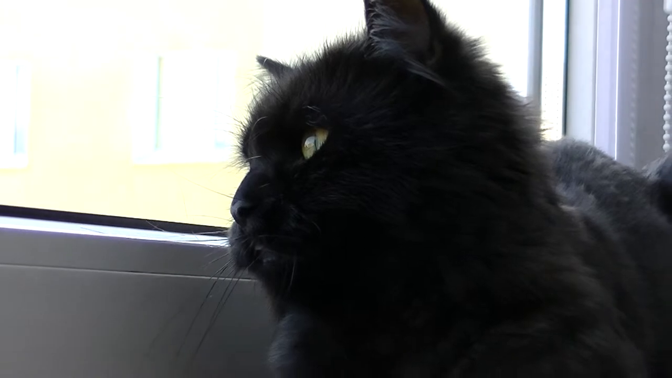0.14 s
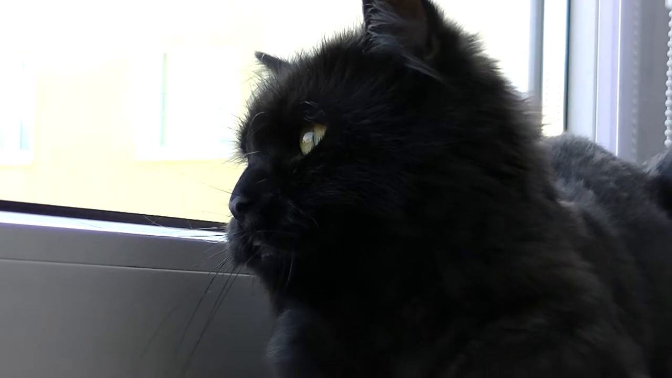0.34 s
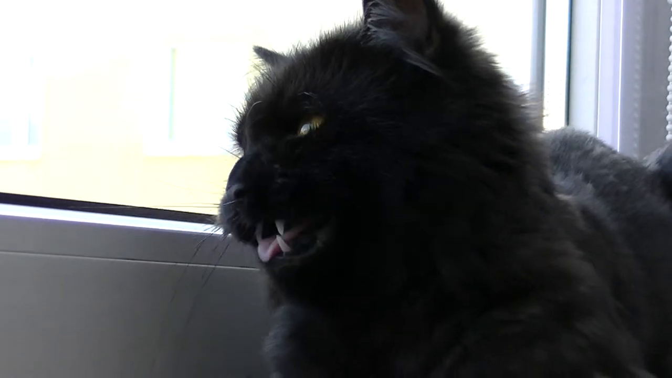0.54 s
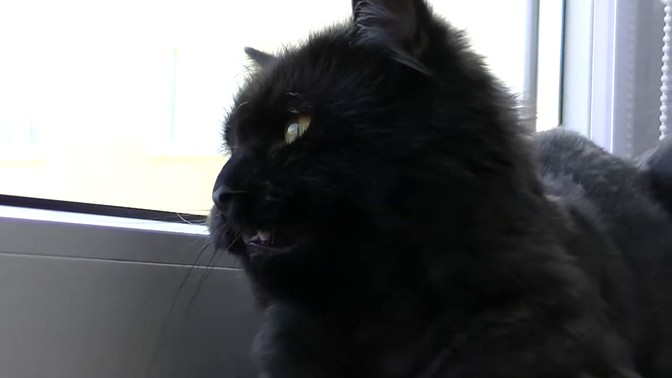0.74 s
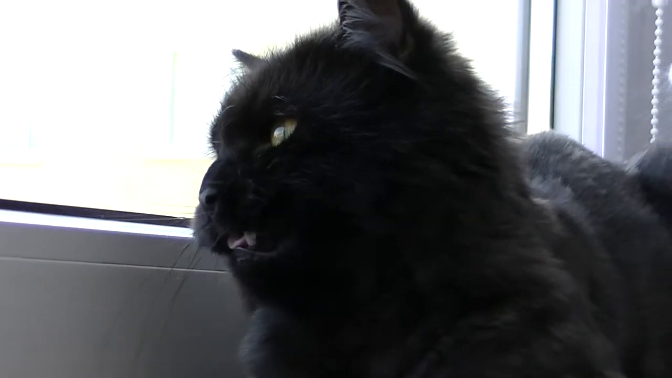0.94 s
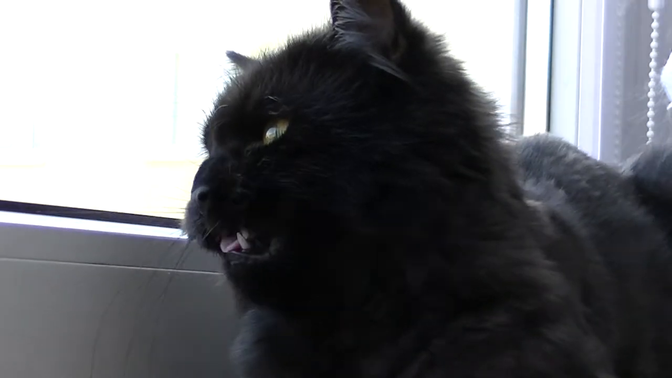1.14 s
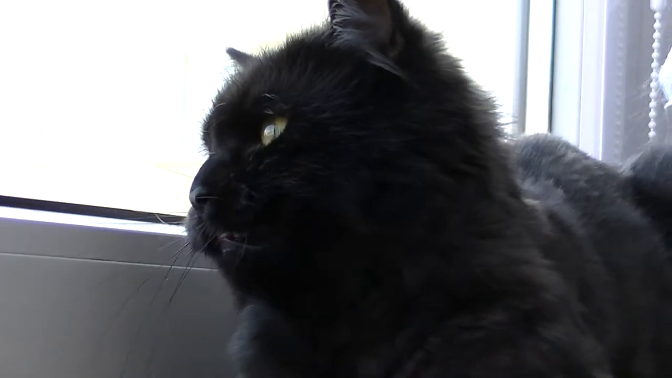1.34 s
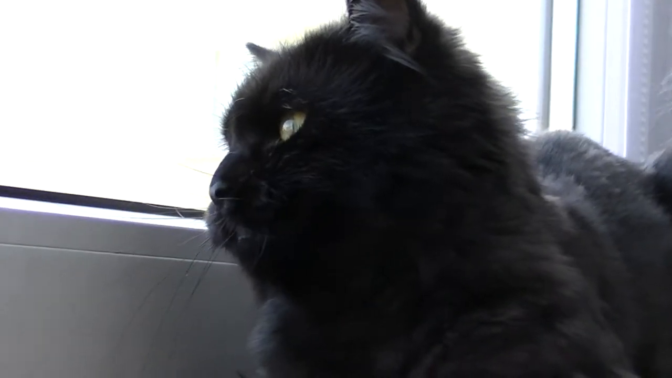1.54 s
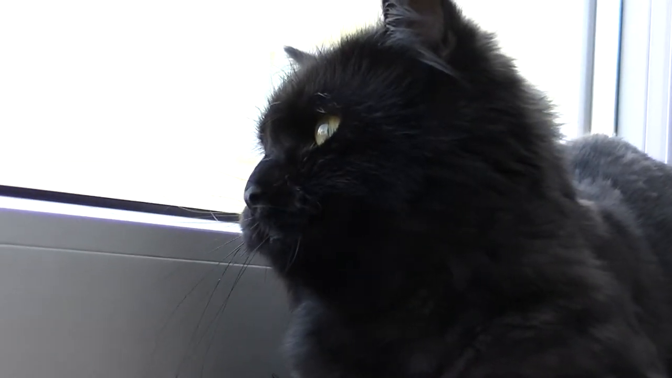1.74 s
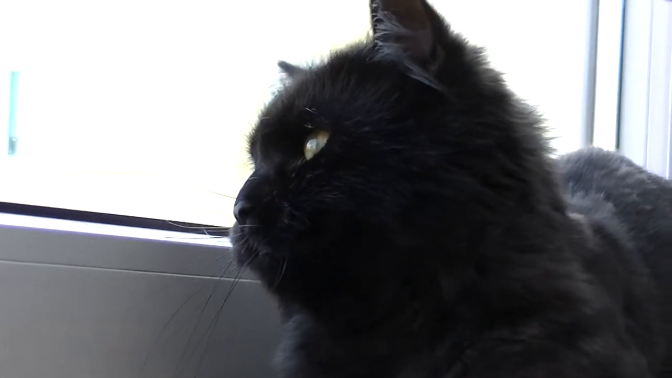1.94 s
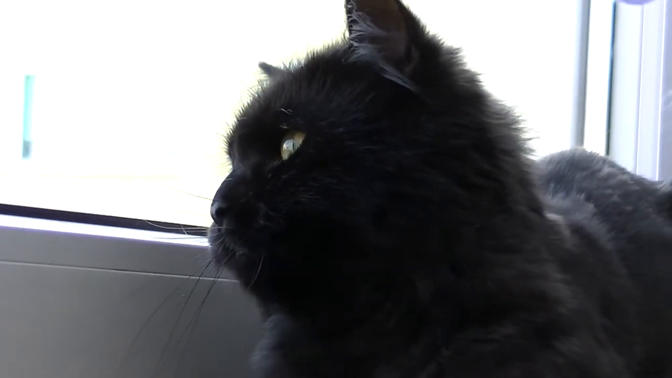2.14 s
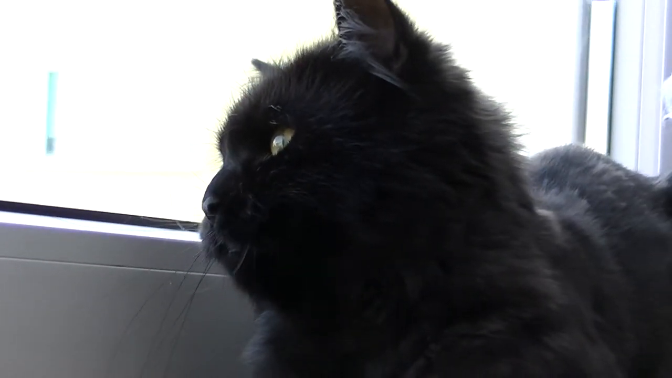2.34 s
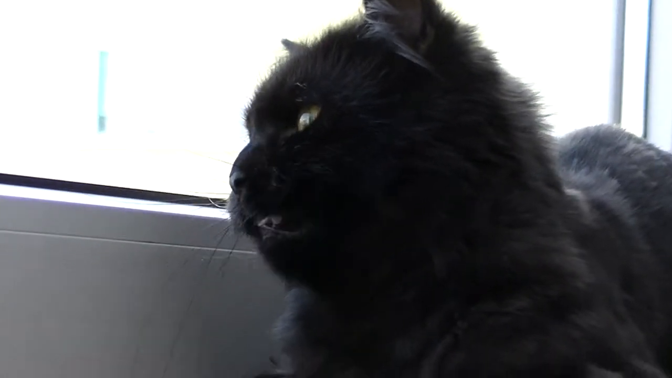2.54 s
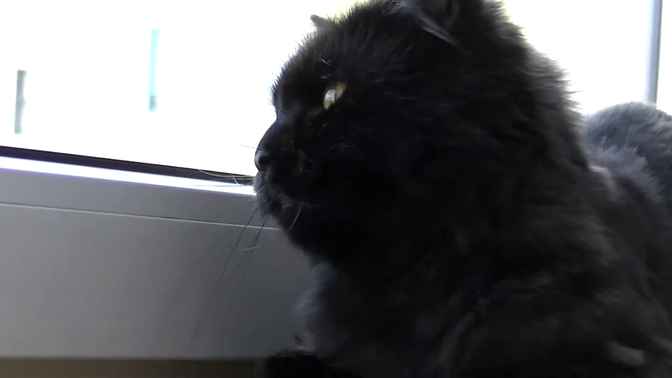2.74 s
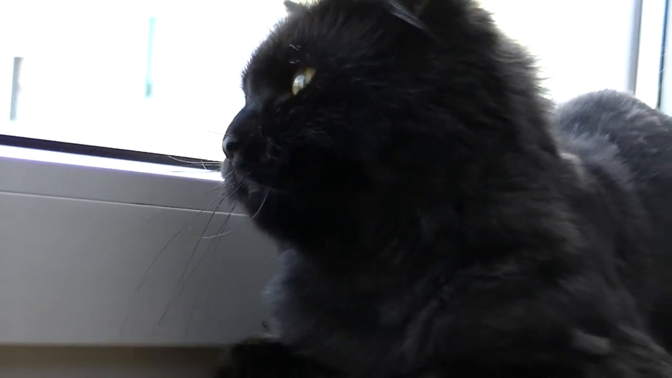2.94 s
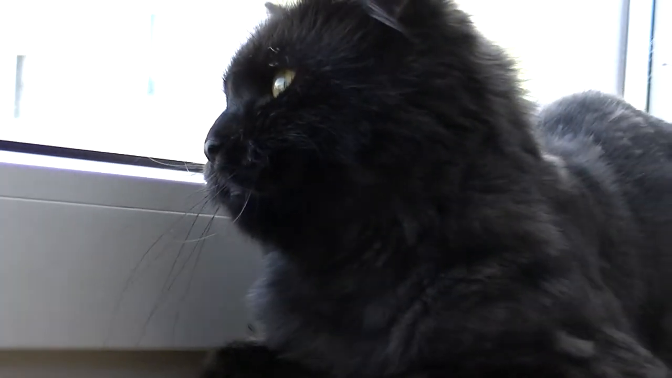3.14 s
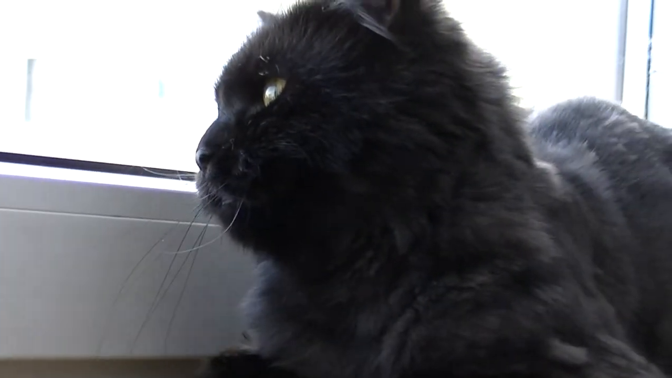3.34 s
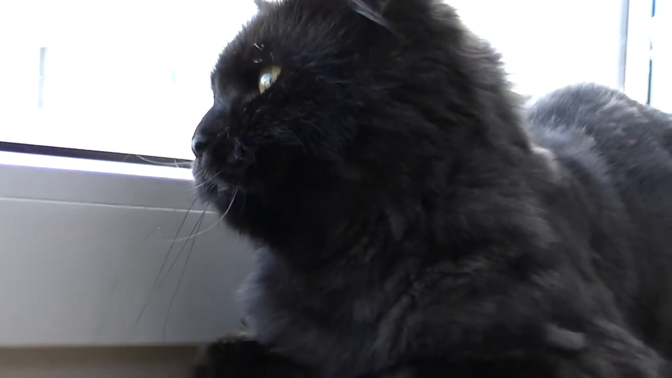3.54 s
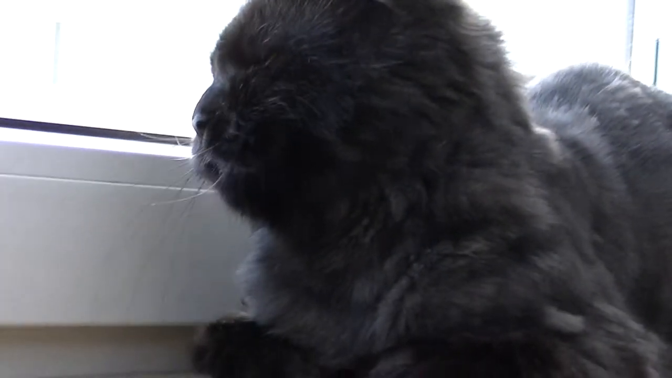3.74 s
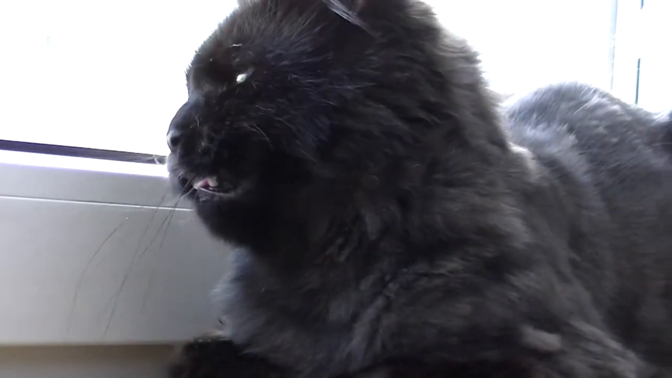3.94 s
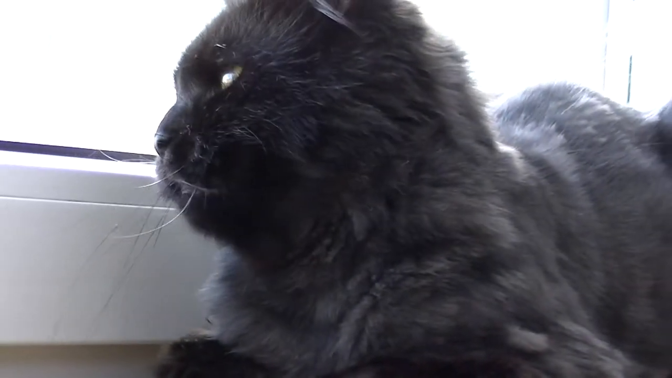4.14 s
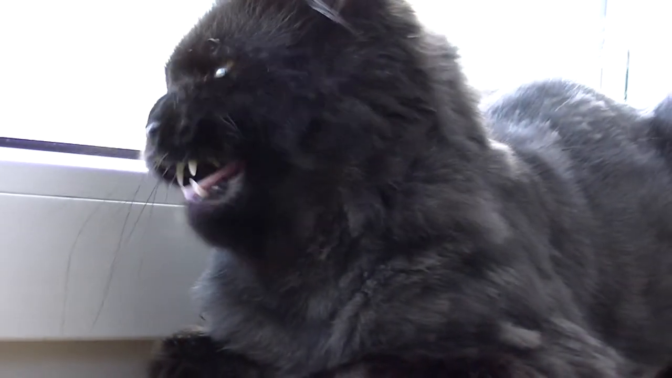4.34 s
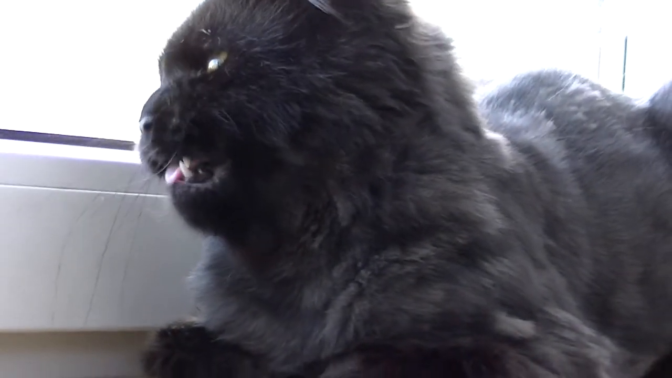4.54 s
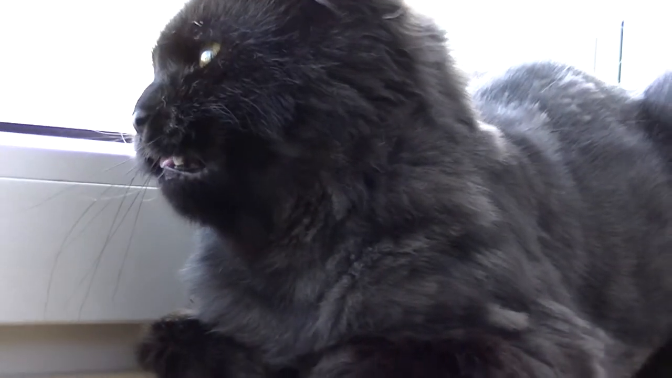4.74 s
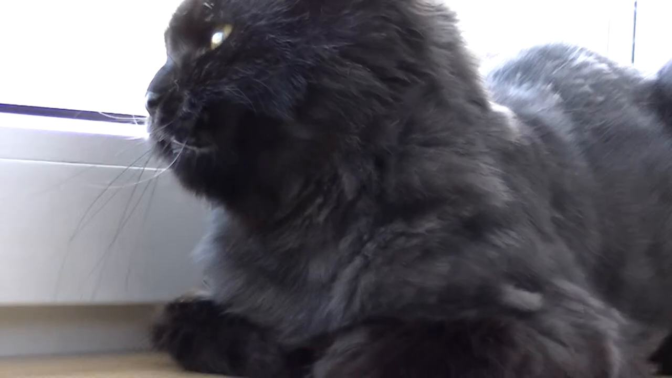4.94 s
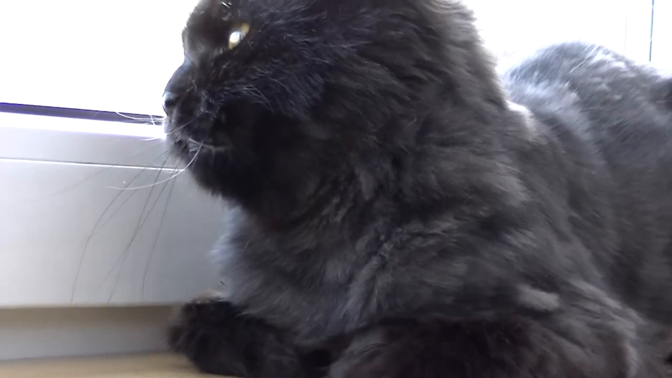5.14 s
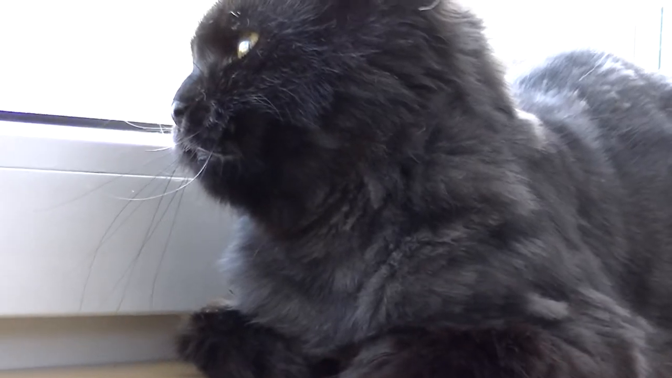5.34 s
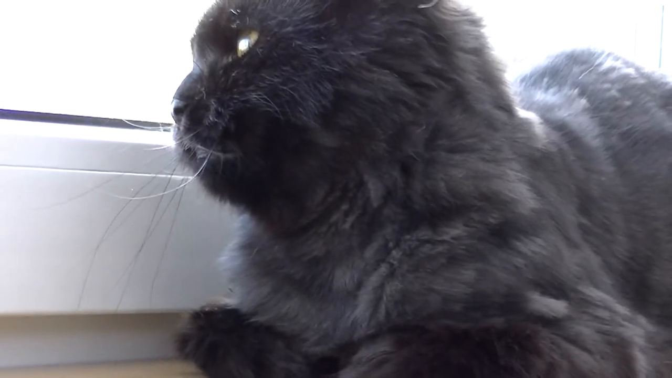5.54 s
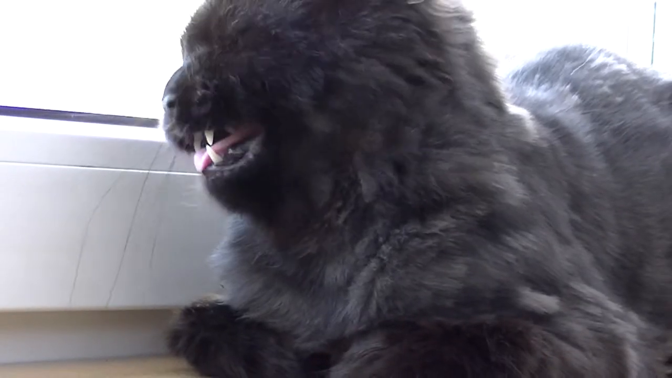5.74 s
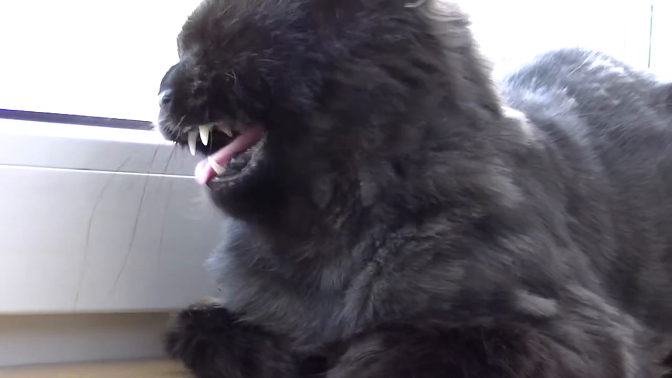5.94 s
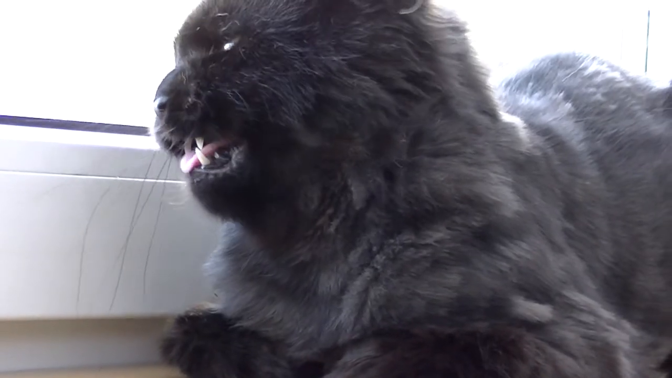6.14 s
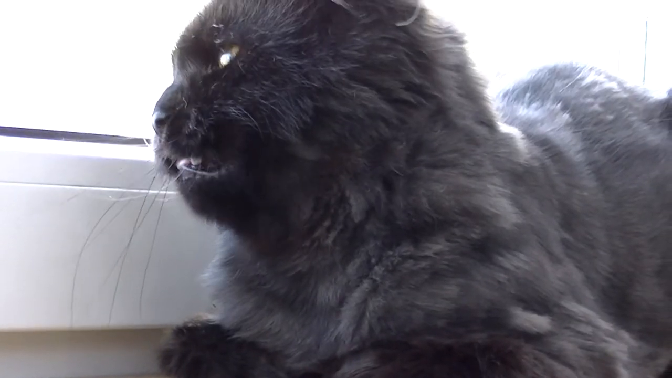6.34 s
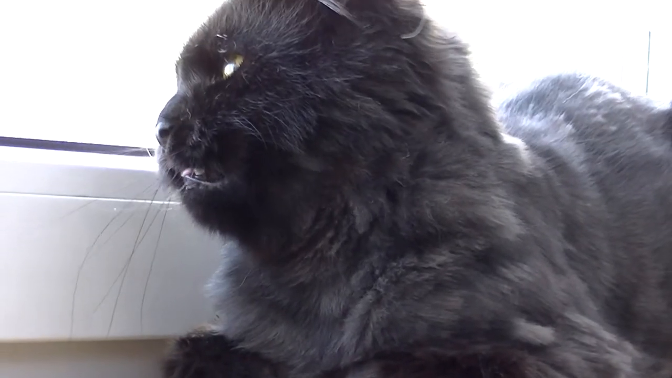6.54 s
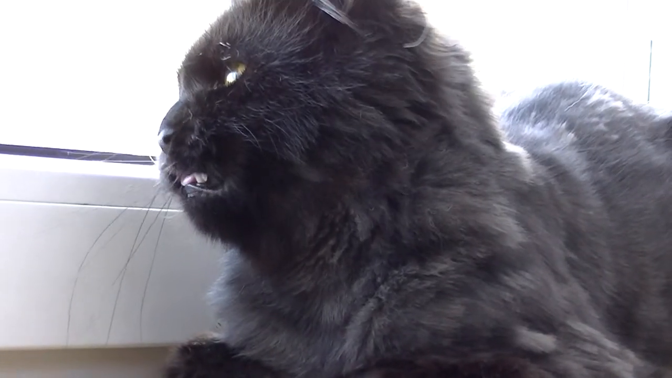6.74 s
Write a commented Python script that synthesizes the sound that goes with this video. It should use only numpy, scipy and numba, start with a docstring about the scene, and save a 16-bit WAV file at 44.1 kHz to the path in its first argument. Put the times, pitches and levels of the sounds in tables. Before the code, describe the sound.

In a quiet room, a nearby cat makes brief, creaky chirps in small clusters with pauses between them, the longest run coming near the end. Each chirp dips in pitch, and many carry a hard little snap of the mouth. Small tongue clicks and two very soft bumps on the sill fall in the gaps. A muffled outdoor wash comes faintly through the window, along with light hiss and barely audible high pips from a focus motor.

```python
"""A window sill in a small quiet room, where a cat chatters at birds, close to the microphone.
Each chirp starts as a clean tone near 600 Hz, then dives and breaks into a creak as the jaw opens
and the vocal folds slacken. The mouth snaps and clicks, and the sill takes two soft bumps.
A dull outdoor wash comes faintly through the glass, over the recorder's hiss, its whine
and the thin pips of its focus motor."""
import sys
import numpy as np
from scipy import signal
from scipy.fft import rfft, irfft
from scipy.io import wavfile
from numba import njit

SR = 44100
rng = np.random.default_rng(int(sys.argv[2]) if len(sys.argv) > 2 else 0)


def int16_out(signal):
    """Quantize to a 16-bit WAV file."""
    q = np.round(np.clip(np.atleast_2d(signal).T, -1, 1) * 32767)
    wavfile.write(sys.argv[1], SR, q.astype(np.int16))


N = 304013

# The cat's chirps. Each row: start, length, attack, release, time until the voice breaks and dive time,
# all in seconds; opening, lowest and final pitch in Hz; base levels of fundamental, throat and mouth
# in dB; creak roughness from 0 to 1; lip resonance at the widest gape in Hz; and its gain in dB,
# which grows as the head turns this way.
CHIRPS = [ (.576, 0.083, 0.0089, 0.031, 0.0095, .045, 621, 235.2, 222, -41, -39, -32.5, 0.98, 5340, -3.5),
          (.867, .11, 0.023, .053, 0.014, 0.04, 594.8, 338.8, 369, -43, -44, -42, 1, 4800, -6.5),
          (1.133, .084, 0.0036, 0.022, 0.0012, 0.019, 525, 345.8, 514, -43.5, -50, -47, .8, 4900, -9),
          (2.448, 0.11, 0.0019, 0.031, 0.055, 0.024, 550, 284, 338, -45, -44.5, -41, .8, 5400, -5.5),
          (3.86, 0.17, .05, 0.11, 0.07, 0.023, 602.3, 486.5, 450, -43, -42.5, -42.5, 0.72, 4140, -5),
          (4.296, 0.084, .012, 0.024, 0.022, 0.029, 612.4, 252.5, 224.5, -40.5, -41.5, -36, 0.95, 5270, -2.5),
          (4.551, 0.13, .042, 0.048, .026, 0.015, 564.6, 470.4, 540.6, -41, -51.5, -48, 0.8, 4000, -2),
          (5.723, 0.11, 0.0066, 0.032, .035, .042, 623.8, 254, 223, -41.5, -41.5, -37, .97, 5030, -4),
          (5.93, 0.11, 0.015, 0.051, .02, 0.035, 612, 244.7, 356, -41, -45.5, -41, 0.97, 5350, -2),
          (6.135, 0.086, 0.0385, 0.022, 0.027, .022, 547, 433.7, 442, -44.5, -45, -42, 0.48, 4500, 0),
          (6.409, 0.11, 0.0194, 0.04, 0.017, 0.018, 583, 437.2, 501.6, -46, -41.5, -40.5, 0.46, 4770, 0),
          (6.782, 0.11, 0.0353, 0.06, 0.0197, .06, 554, 473, 464, -51, -52, -49.5, 0.084, 4670, 4.5), ]
# The throat's ring. Each row: centre in Hz, width in Hz, relative gain in dB.
THROAT_MODES = [(828, 280, -8.5), (1179, 150, -11.5)]
# The mouth's vowel, jaw half open. Each row: centre in Hz, width in Hz, relative gain in dB.
MOUTH_MODES = [(1736, 1220, -2), (2254, 1210, 2.5), (3240, 1560, -12.5)]
# The mouth's faint top-end sheen. Each row: centre in Hz, width in Hz, relative gain in dB.
SHEEN_MODES = [(8860, 2400, -38), (11470, 1000, -34), (13600, 810, -35)]
# Hard snaps inside the chirps. Each row: start in seconds, dry peak in dB.
SNAPS = [(0.624, -19), (1.159, -35), (2.517, -30), (4.331, -22.5), (4.345, -21.5), (5.788, -22.5),
         (5.972, -24), (5.98, -24.5), (6.195, -24.5)]
# The ring of a snap. Each row: centre in Hz, width in Hz, relative gain in dB.
SNAP_MODES = [(2210, 320, 11.4), (3730, 790, 6.2), (4690, 380, 5.5)]
# Wet clicks of tongue and lips. Each row: start in seconds, dry peak in dB, centre in Hz, width in Hz,
# seconds for the crackle to fall 60 dB.
CLICKS = [(.392, -36.5, 2840, 1100, 0.019), (0.3932, -39, 5800, 800, 0.0043),
          (.685, -43.5, 7700, 3000, 0.019), (1.163, -34, 5050, 1190, 0.094), (2.082, -37, 1960, 910, 0.042),
          (2.084, -35, 4070, 1500, 0.016), (3.729, -32, 3930, 1210, 0.011),
          (4.757, -46.5, 8950, 2000, .015), (6.072, -47, 8760, 2400, .015),
          (6.743, -32.5, 2690, 3000, 0.04)]
# Soft bumps on the sill. Each row: start in seconds, dry peak in dB.
BUMPS = [(3.418, -47.5), (4.998, -51)]
# Runs of focus motor pips. Each row: start in seconds, length in seconds, motor steps from pip to pip,
# pitch in Hz, glide to either side as a share of the pitch (negative falls), typical level in dB.
FOCUS_RUNS = [(1.238, .5, 1, 4820, -0.019, -69.5), (4.695, 1.55, 1, 4840, -0.015, -70.5),
              (4.931, .5, 2, 4000, .055, -67), (6.288, .1, 2, 4000, 0.037, -64)]
# The ring of the window recess. Each row: centre in Hz, width in Hz, relative gain in dB.
RECESS_MODES = [(513, 9, -7.5), (615.5, 12, 10), (785, 38, 0), (902, 32, -5.5), (913, 28, 1.5),
                (1220, 38, -21)]
# Tone of the bed of murmur and hiss. Each row: frequency in Hz, relative level in dB.
BED_SPECTRUM = [(15, -58), (25, -15), (122, -15), (152, -17), (183, -13.5), (445, -6.5), (482, -6.5),
                (631, -2.5), (871, -2.5), (970, 0), (2700, -13.5), (4870, -17), (5580, -17.5), (7700, -18),
                (15500, -23.5)]
# Stereo width of the bed. Each row: frequency in Hz, side level against mid in dB.
BED_WIDTH = [(60, 3), (110, -2), (200, -5.5), (380, -5.5), (700, -9.5), (1290, -12), (2380, -7), (4400, -8),
             (8120, -22), (15000, -93)]
# The ebb of the outdoor murmur. Each row: time in seconds, relative level in dB.
OUTDOOR_EBB = [(0, 7.5), (1.5, 6), (2.3, 4.5), (3.2, 3), (5.2, 1.5), (6.9, 2)]

TOP_HZ = 15800  # ceiling of the overtones and of the mix


def cat():
    """The lead: chirps, mouth snaps, wet clicks and small shifts of weight on the sill."""
    out = np.zeros(N)
    for start, *shape, lip_db in CHIRPS:
        add(out, start, chirp(shape, lip_db))
    for start, db in SNAPS:
        add(out, start, undb(db) * snap())
    for start, db, hz, width_hz, t60 in CLICKS:
        add(out, start, undb(db) * knock([(hz, width_hz, 0)], t60, grit=0.081))
    for start, db in BUMPS:
        add(out, start, undb(db) * knock([(294, 130, 11), (800, 400, -14)], t60=0.016, grit=0.6))
    return out


def chirp(shape, lip_db, shut_s=0.0086, low_cut_hz=205):
    """A pure fundamental, plus the buzz of the folds ringing the throat and the moving mouth."""
    hz, tone_db, throat_db, mouth_db, rough, lip_hz = gesture(*shape)
    phase, buzz = vocal_folds(hz, rough)
    left_s = np.arange(len(hz))[::-1] / SR
    gate = signal.windows.tukey(len(hz), .06) * np.minimum(left_s / shut_s, 1)
    fundamental = gate * undb(tone_db) * np.sqrt(2) * np.sin(2 * np.pi * phase)
    throat = resonate(gate * buzz * undb(throat_db), THROAT_MODES)
    mouth = resonate(gate * buzz * undb(mouth_db), mouth_modes(lip_hz, lip_db))
    # so small a mouth radiates no bass
    low_cut = signal.butter(6, low_cut_hz, "high", fs=SR, output="sos")
    return signal.sosfilt(low_cut, np.pad(fundamental + throat + mouth, (0, len(hz))))


def gesture(length, attack, release, break_s, dive_s, start_hz, lowest_hz, end_hz,
            tone_db, throat_db, mouth_db, roughness, open_hz,
            sag_hz_per_s=480, shut_hz=3940, clean_rough=.12, hard_attack_s=0.0068):
    """One chirp's control curves: at the break the jaw drops, the pitch dives and the folds creak."""
    t = np.arange(int(length * SR)) / SR
    stages = np.sort([0, break_s, break_s + dive_s, length])
    onset = np.clip(1 - t / attack, 0, 1)
    fade = np.clip(1 - (length - t) / release, 0, 1)
    break_hz = start_hz - sag_hz_per_s * break_s
    hz = np.exp(np.interp(t, stages, np.log([start_hz, break_hz, lowest_hz, end_hz])))
    hz *= 1 + 0.0801 * onset  # starts sharp, settles in the attack
    jaw = np.interp(t, stages, [0, 0.37, 1, 0.05])  # 0 shut, 1 widest
    lip_hz = shut_hz + (open_hz - shut_hz) * jaw
    # the creak is full about halfway down the dive and eases in the release
    fallen = (break_hz - hz) / max(break_hz - lowest_hz, 1)
    cracked = np.clip(fallen / 0.458, 0, 1) * (1 - 0.19 * fade)
    # the folds catch briefly at the break, and a hard attack opens with a rasp
    catch = (t > break_s) * np.exp(-np.abs(t - break_s) / 0.0075)
    rasp = max(1 - attack / hard_attack_s, 0) * np.exp(-t / .03)
    creak = np.minimum(cracked + 0.26 * catch + rasp, 1)
    rough = np.clip(clean_rough + (roughness - clean_rough) * creak, 0, 1)
    # the fundamental comes first and lingers; the creak shifts its energy into the overtones
    effort_db = 2.5 * catch - 26.5 * onset - 25 * fade
    tone_db = tone_db - 15.5 * onset - 3 * fade - 10 * rough
    throat_db = throat_db + effort_db + 6 * rough
    mouth_db = mouth_db + effort_db + 9.5 * rough
    return hz, tone_db, throat_db, mouth_db, rough, lip_hz


def vocal_folds(hz, rough, jitter=0.0988, shimmer_db=3, full_air_share=.5, puff_cycles=.5):
    """Slackening folds turn irregular: every cycle gets its own length and strength."""
    stretch, size = rng.standard_normal((200, 2)).T
    cycle = np.cumsum(hz / SR).astype(int)
    phase = np.cumsum(hz * np.exp(jitter * rough * stretch[cycle]) / SR)
    accent = np.clip(size[np.round(phase).astype(int)], -2, 1.5)
    strength = undb(shimmer_db * rough * (accent - 2.5))
    harmonic = np.arange(2, 64)[:, None]
    overtones = np.cos(2 * np.pi * harmonic * phase) * (harmonic * hz < TOP_HZ)
    pulses = overtones.sum(0) * 2 * np.sqrt(hz / SR)
    # air escapes once a cycle, more of it as the folds lose their grip
    puffs = unit(noise(len(hz)) * (0.59 + np.exp(-(phase % 1) / puff_cycles)))
    air = full_air_share * rough ** 2.26
    return phase, strength * (np.sqrt(1 - air) * pulses + np.sqrt(air) * puffs)


def mouth_modes(lip_hz, lip_db, lip_width_hz=520, half_open_hz=4700, sheen_db_per_khz=7):
    """The opening jaw sweeps the lip resonance, tugs the vowel along and lets more sheen escape."""
    pull = (lip_hz / half_open_hz) ** 0.31
    lift_db = sheen_db_per_khz * (lip_hz - half_open_hz) / 1000
    vowel = [(hz * pull, width, db) for hz, width, db in MOUTH_MODES]
    sheen = [(hz, width, db + lift_db) for hz, width, db in SHEEN_MODES]
    return vowel + [(lip_hz, lip_width_hz, lip_db)] + sheen


def snap(high_cut_hz=5800):
    """A hard tick inside the mouth, rolled off above its highest resonance, peak 1."""
    high_cut = signal.butter(6, high_cut_hz, fs=SR, output="sos")
    tick = signal.sosfilt(high_cut, knock(SNAP_MODES, t60=.008, grit=0.21))
    return tick / np.abs(tick).max()


def knock(modes, t60, grit, samples=6000):
    """A tick and a short crackle ringing broad resonances, peak 1."""
    t = np.arange(samples) / SR
    crackle = grit * noise(samples) * undb(-60 * t / t60)
    ring = resonate(signal.unit_impulse(samples) + crackle, modes)
    return ring / np.abs(ring).max()


def focus_motor(pip_s=.024, step_s=.04, scatter_db=3):
    """The lens steps at an even rate, making faint, nearly pure pips of uneven strength."""
    out = np.zeros(N)
    ramp = np.linspace(-1, 1, int(pip_s * SR))
    for start, length, steps, hz, glide, db in FOCUS_RUNS:
        phase = np.cumsum(hz * (1 + glide * ramp)) / SR
        pip = np.sqrt(2) * np.sin(2 * np.pi * phase) * np.hanning(len(ramp))
        times = np.arange(start, start + length, steps * step_s)
        for t, accent in zip(times, noise(64)):
            add(out, t - pip_s / 2, undb(db + scatter_db * accent) * pip)
    return out


def room(x, t60=0.28, build_s=0.0032, pane_s=0.00235, pane_db=-13, side_db=-16):
    """The pane throws back a quick echo, the recess rings, and the room adds a short, narrow tail."""
    t = np.arange(SR // 2) / SR
    decay = undb(-60 * t / t60) * (1 - np.exp(-(t / build_s) ** 2))
    envelope = undb(-11) * decay / np.linalg.norm(decay)
    tail_eq = [(150, -5), (450, 8), (1000, 6.5), (2500, 5.5), (3500, 6), (5000, 2.5), (12000, -1)]
    mid, side = (colour(noise(len(t)), tail_eq) * envelope for _ in range(2))
    mid[0] += 1  # direct sound
    mid[int(pane_s * SR)] += undb(pane_db)
    impulse = signal.unit_impulse(len(t))
    mid += sum(undb(db - 7) * band(impulse, hz, width) for hz, width, db in RECESS_MODES)
    return np.array([signal.fftconvolve(x, mid + sign * undb(side_db) * side)[:N] for sign in (1, -1)])


def background(bed_db=-58.5, recess_db=-67.5, whine_db=-84, whine_hz=(7800, 7827)):
    """Outdoor murmur ebbs and rings in the window recess, over steady hiss and an electronic whine."""
    t = np.arange(N) / SR
    mid, side = (undb(bed_db) * unit(colour(noise(N), BED_SPECTRUM)) for _ in range(2))
    ebb = undb(np.interp(t, *np.transpose(OUTDOOR_EBB)) - 6.5)
    mid += (ebb - 1) * band(mid, 970, 850)  # ride only the murmur's band
    ring = sum(undb(db) * band(colour(noise(N), BED_SPECTRUM), hz, width)
               for hz, width, db in RECESS_MODES)
    recess = ebb * undb(recess_db) * unit(ring)
    whine = undb(whine_db) * np.sqrt(2) * sum(np.sin(2 * np.pi * hz * t) for hz in whine_hz)
    spread = colour(side, BED_WIDTH) * np.array([[1], [-1]])
    return mid + recess + whine + spread


def resonate(x, modes):
    """Steep, possibly moving resonances side by side; white input roughly keeps its power."""
    out, power = 0, 0
    for k, (hz, width, db) in enumerate(modes):
        hz = np.minimum(hz * np.ones(len(x)), .45 * SR)
        ring = swept_band(swept_band(x, hz, 1.5 * width), hz, 1.5 * width)
        out = out + (-1) ** k * undb(db) * ring
        power += undb(db) ** 2 * 2 * width / SR
    return out / np.sqrt(power)


@njit
def swept_band(x, hz, width_hz):
    """Band-pass whose centre can move every sample, gain 1 at the centre."""
    out, band_state, low_state = np.empty(len(x)), 0., 0.
    for i in range(len(x)):
        tuning, damping = np.tan(np.pi * hz[i] / SR), width_hz / hz[i]
        ring = (band_state + tuning * (x[i] - low_state)) / (1 + tuning * (tuning + damping))
        band_state = 2 * ring - band_state
        low_state += 2 * tuning * ring
        out[i] = damping * ring
    return out


def band(x, hz, width_hz):
    """Two-pole resonance, gain 1 at its centre."""
    return signal.lfilter(*signal.iirpeak(hz, hz / width_hz, fs=SR), x)


def colour(x, points):
    """EQ a sound through (Hz, dB) points."""
    hz, db = np.transpose(points)
    bins_hz = np.maximum(np.fft.rfftfreq(len(x), 1 / SR), 1)
    return irfft(rfft(x) * undb(np.interp(np.log(bins_hz), np.log(hz), db)), len(x))


def add(track, t, x):
    """Mix a sound in at t seconds."""
    i = int(t * SR)
    track[i:i + len(x)] += x[:max(N - i, 0)]


def undb(db):
    return 10 ** (np.asarray(db) / 20)


def unit(x):
    return x / np.sqrt(np.mean(x ** 2))


def noise(count):
    return rng.standard_normal(count)


def scene():
    """Cat and focus motor in the room, over the background, all a touch to the left."""
    balance = undb([[.17], [-.17]])
    return (room(cat() + focus_motor()) + background()) * balance


def record(dry):
    """The recorder cuts the top end steeply."""
    return signal.sosfilt(signal.ellip(10, .1, 60, TOP_HZ, fs=SR, output="sos"), dry)


dry = scene()
out = record(dry)
int16_out(out)
```